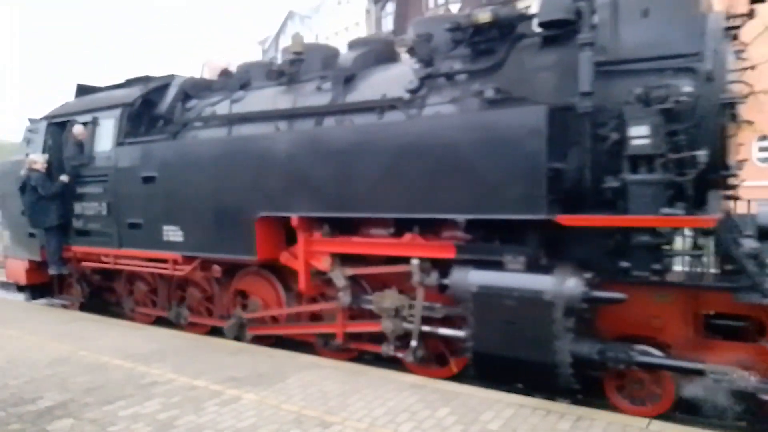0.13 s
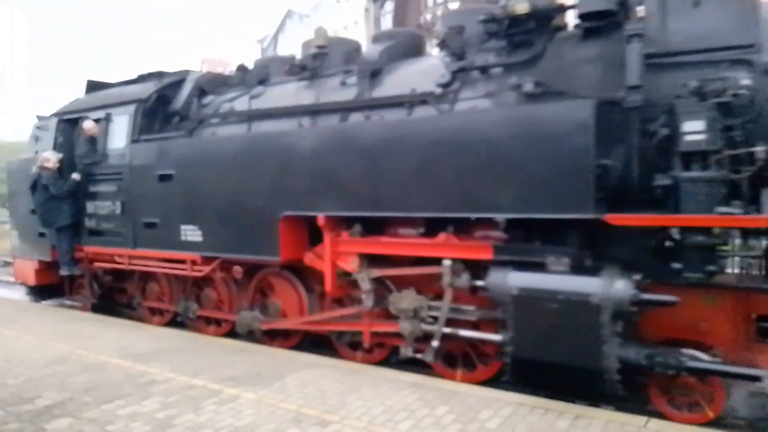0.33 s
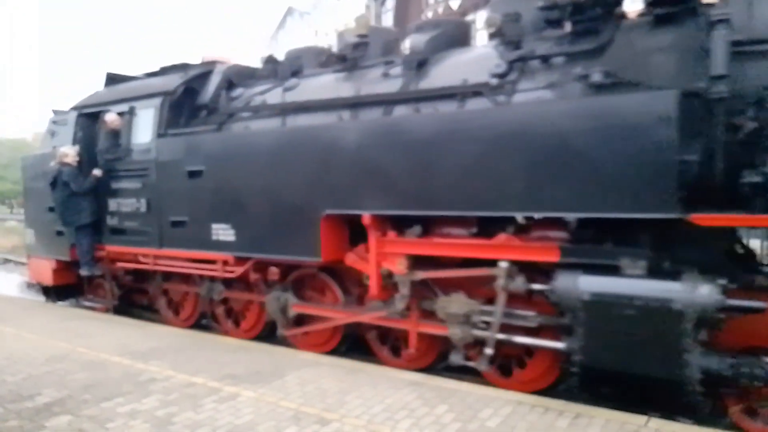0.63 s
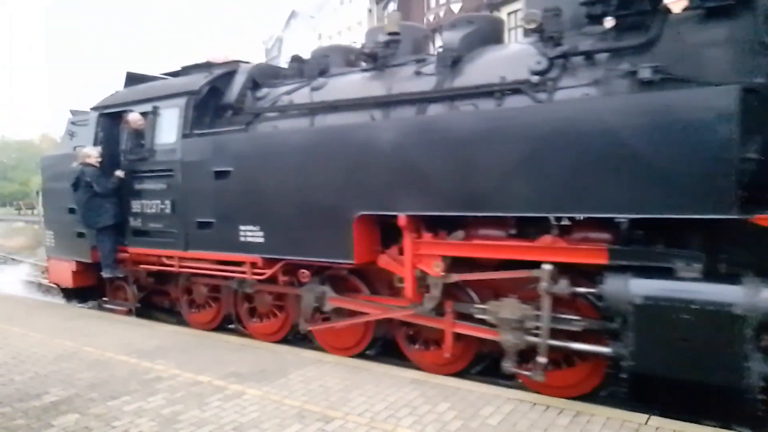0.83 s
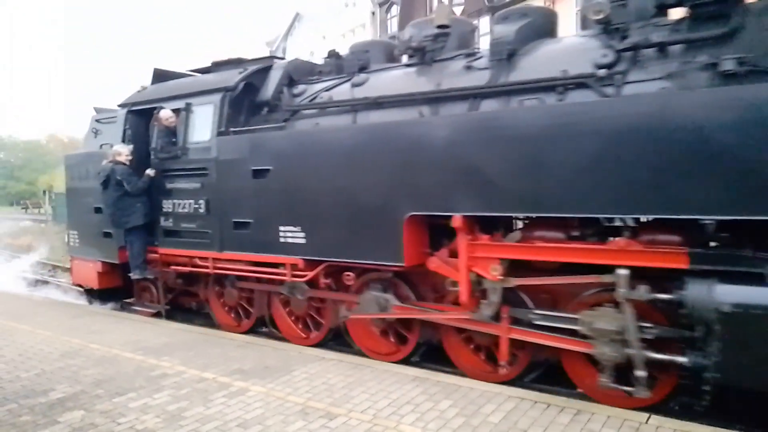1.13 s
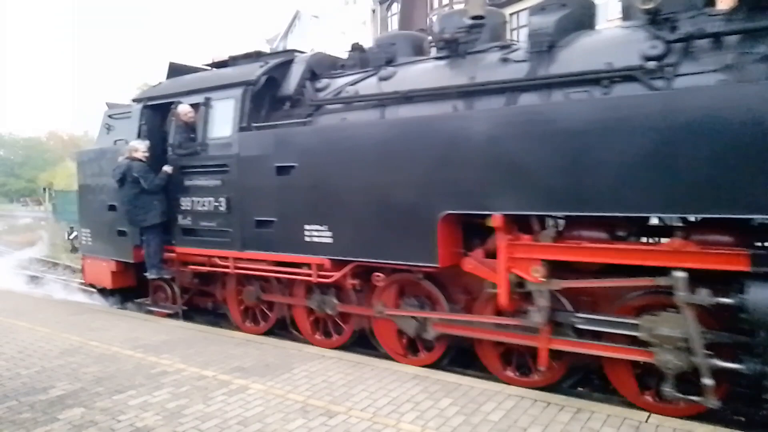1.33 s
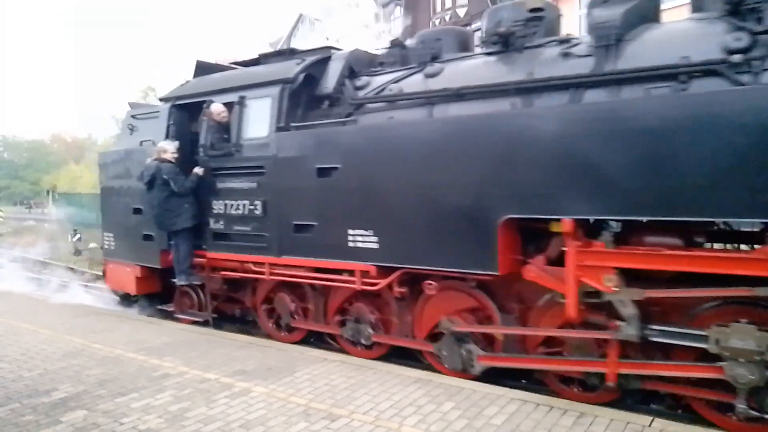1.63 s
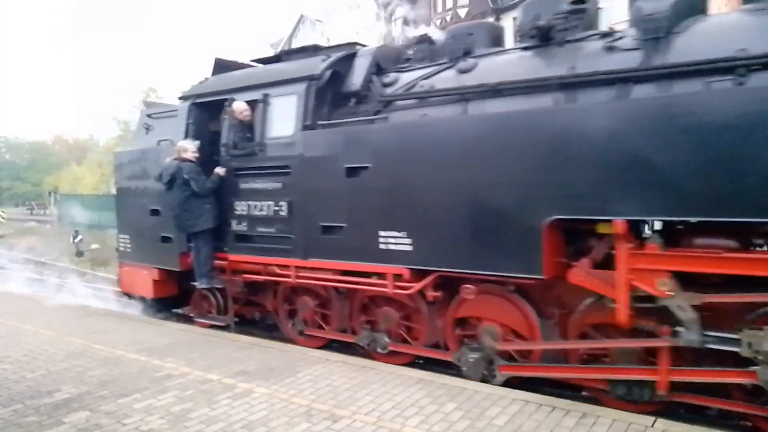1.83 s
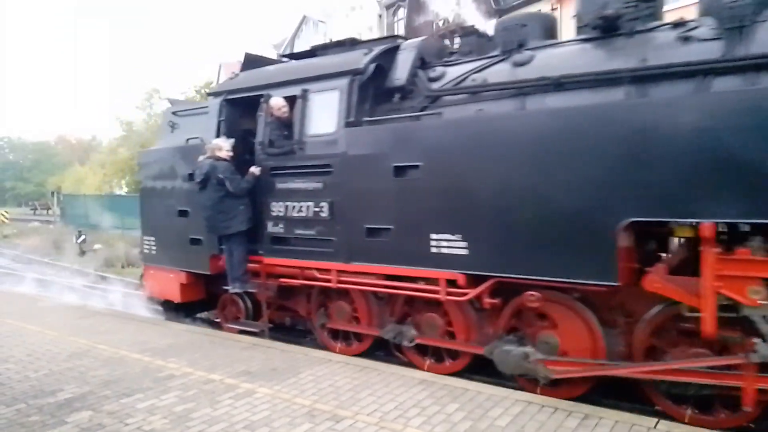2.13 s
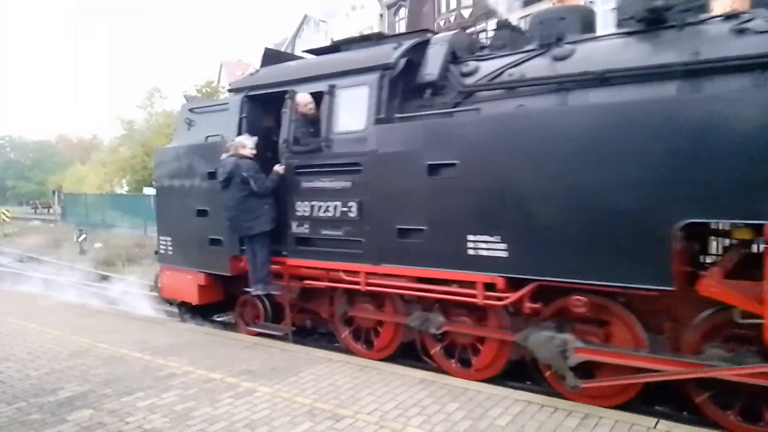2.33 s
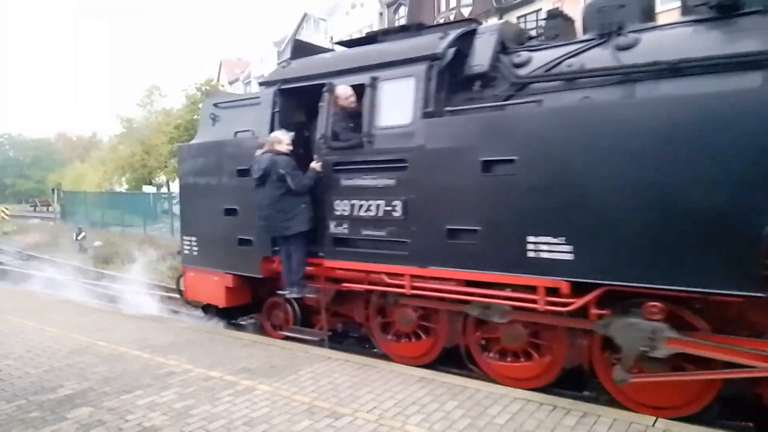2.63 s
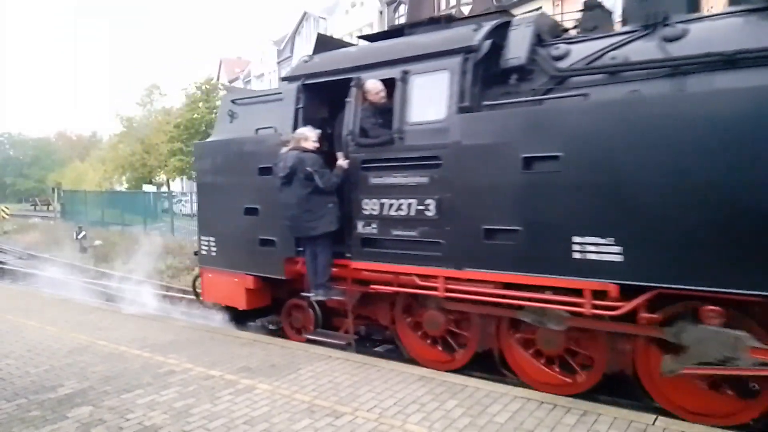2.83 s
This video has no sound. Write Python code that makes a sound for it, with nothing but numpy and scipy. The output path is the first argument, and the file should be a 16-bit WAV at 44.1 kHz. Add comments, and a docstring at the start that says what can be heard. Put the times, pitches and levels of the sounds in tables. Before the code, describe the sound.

Sharp, high steam hiss from a passing steam locomotive, with rumbling wheels, clanks and a spitting burst

```python
"""Steam tank locomotive coasting past

A steam tank locomotive coasts slowly past a platform, close by, in mono. Shaped noise makes a steam leak
that hisses sharply throughout; as the cylinder draws level a wet noise blast opens, spits and dies away.
Underneath, noise and sines make the engine rumble and throb; noise bands make the wheels roll and ring,
and decaying modes make the rods clank."""
import sys
import numpy as np
from scipy import signal
from scipy.fft import rfft, irfft, next_fast_len
from scipy.io import wavfile
from scipy.ndimage import uniform_filter1d, map_coordinates

SR = 44100
rng = np.random.default_rng(int(sys.argv[2]) if len(sys.argv) > 2 else 0)


def pcm_store(signal):
    """Save signal as 16-bit PCM."""
    levels = np.round(np.clip(np.atleast_2d(signal), -1, 1) * 32767)
    wavfile.write(sys.argv[1], SR, levels.astype(np.int16).T)


N = 131859

# Every colour table is a noise spectrum. Each row: frequency in Hz, relative level in dB per Hz.
# Diffuse hiss behind everything, as a colour.
FLOOR_COLOUR = [(1000, 0), (2300, 1.5), (3100, -10), (5200, -2), (12000, -1), (15000, -4.5)]
FLOOR_DB, TOP_HZ = -55, 15760  # TOP_HZ: upper band limit of the whole mix

# Engine rumble over time. Each row: time in seconds, level in dB.
RUMBLE_LEVEL = [(0, -46), (.85, -48), (1.25, -46.5), (1.75, -48), (2.07, -45.5), (2.58, -50), (2.99, -45)]
# The engine's low body, as a colour.
RUMBLE_COLOUR = [(110, -52), (165, -44), (200, -4.5), (280, 3.5), (385, 3.5), (450, -3.5), (560, -15.5),
                 (1000, -26.5)]
# The deep bass under the engine, as a colour.
BASS_COLOUR = [(22, -43), (38, -12), (62, 2.5), (115, 3.5), (140, -4.5), (165, -15), (260, -54)]
THROB_PER_S, THROB_DB = 15, 1.17
BASS_DB, HUM_HZ, HUM_DB = -15, 82.4, -24  # levels relative to the rumble
SURGES_S, SURGE_SPREAD_S, SURGE_DB = [.12, 1.22, 2.11, 2.96], 0.032, 5.5  # swells of the bass

# Low roar of rolling. Each row: time in seconds, level in dB.
ROAR_LEVEL = [(0, -48.5), (.3, -45), (.41, -49.5), (.6, -48), (.9, -46), (1.07, -48.5), (1.2, -45.5),
              (1.6, -53), (2.0, -49.5), (2.3, -49.5), (2.6, -54.5), (2.99, -54.5)]
# The rolling roar, as a colour.
ROAR_COLOUR = [(140, -27), (480, -7.5), (610, 1.5), (735, 3.5), (880, -4.5), (1040, -10), (1250, -17),
               (2000, -24.5), (3000, -50)]
# The wheels' ringing band. Each row: time in seconds, level in dB, centre in Hz, width in Hz.
WHEEL_RING = [(0, -45, 1660, 793), (.26, -48, 1650, 698), (.4, -49.5, 1640, 302.3), (.6, -52, 1560, 482),
              (.77, -57, 1556, 257.6), (.93, -52, 1549, 150.5), (1.07, -57.5, 1535, 140.3),
              (1.2, -42, 1607, 450), (1.7, -70, 1660, 330)]
# Modes of the singing wheel. Each row: frequency in Hz, half-width in Hz, relative level in dB.
WHEEL_MODES = [(1229, 33, 0.5), (1315, 28, -14.5), (1643, 54, -1), (1747, 19, -2.5), (2030, 210, -15)]
SING_DB, SING_NEAREST_S, SING_PASS_S, SING_GRAIN_DB = -46.5, 2.2, 0.5, 0.5

# Thuds of the running gear. Each row: start in seconds, level in dB, pitch in Hz.
THUDS = [(.542, -41, 250), (.683, -33.5, 277), (1.116, -34.5, 294), (1.373, -35.5, 338),
         (2.278, -35.5, 299), (2.354, -39, 280)]
THUD_T60_S = 0.091
# Clicks of small steel parts. Each row: start in seconds, level in dB, centre in Hz.
CLICKS = [(.433, -49.5, 3760), (.481, -53, 2920)]
CLICK_WIDTH_HZ, CLICK_T60_S = 280, 0.052
# Rod clanks. Each row: start in seconds, knock level in dB, rattle T60 in seconds, note in Hz.
CLANKS = [(.230, -41.5, 0.51, 645), (.430, -39, 0.86, 1163), (0.481, -45, 0.49, 690),
          (1.098, -40, 0.26, 1544), (2.613, -53, 0.082, 1880)]
# Modes of the rod. Each row: frequency in Hz, half-width in Hz, relative level in dB.
ROD_MODES = [(274, 31, -1), (735, 98, 1.5), (1174, 65, -1.5), (1470, 190, -8), (2090, 220, -18)]
STRIKE_DB, NOTE_DB, NOTE_T60_S = -2.5, 1.5, 0.11  # levels relative to the knock

# Steam leak over time. Each row: time in seconds, level in dB.
LEAK_LEVEL = [(0, -32.5), (.62, -32.5), (.86, -35), (1.19, -32), (1.22, -27.5), (1.36, -32), (1.47, -29.5),
              (1.6, -31.5), (1.9, -30.3), (2.1, -29), (2.3, -30.5), (2.63, -31.5), (2.85, -30.5),
              (2.99, -32)]
# The narrow jet of the leak, as a colour.
LEAK_COLOUR = [(2000, -44), (4500, -56), (6400, -38.5), (7000, -25), (7600, -15), (8600, -6.5), (9200, -2),
               (9580, -0.5), (10100, -4), (10800, -8.5), (11650, -13.5), (12250, -45), (15800, -35)]
# Top fizz of the leak over time. Each row: time in seconds, level in dB.
FIZZ_LEVEL = [(0, -68), (1.18, -76), (1.23, -40), (1.5, -38.5), (1.78, -36.5), (1.95, -40), (2.05, -47),
              (2.45, -42.5), (2.99, -48)]
# The top fizz, as a colour.
FIZZ_COLOUR = [(9000, -55), (12000, 4), (14000, -2.5), (14700, -10), (15400, -1), (16000, 4)]
# Thin edge tones of the jet. Each row: frequency in Hz, full level in dB, time of full level in seconds.
EDGE_TONES = [(13100, -49, 2.72), (14600, -49, 3)]
EDGE_TONE_WIDTH_HZ, EDGE_TONE_RISE_DB_PER_S = 125, 38
JET_NOTE_HZ, JET_NOTE_WIDTH_HZ, JET_NOTE_DB = 9590, 61, -33.5
JET_NOTE_S, JET_NOTE_SPREAD_S = 2.12, 0.12
SPUTTER_PER_S, SPUTTER_DB, SPUTTER_DECAY_S = 110, 0.69, 0.0087  # droplets flare in the jet

# Water spitting in the steam. Each row: start in seconds, pop level in dB, hiss level in dB.
SPITS = [(1.21, -33.5, -23), (1.2927, -29, -32), (1.3985, -31, -22), (1.4623, -27, -25)]
SPIT_RISE_S, SPIT_HZ = 0.002, 1234

# Cylinder blasts. Each row: start in seconds, body level in dB, treble level in dB,
# hold in seconds, time the port stays open in seconds.
BLASTS = [(-.1, -47, -41.5, 0.07, 0.091), (1.199, -40.5, -40.5, 0.2, 0.77)]
# The body of the blast, as a colour.
BLAST_BODY_COLOUR = [(130, -56), (280, -4), (560, -6), (950, -3.5), (1250, 2.5), (1420, -2), (1850, 0),
                     (2550, -5), (2900, -16.5), (3600, -33)]
# The treble of the blast, as a colour.
BLAST_TREBLE_COLOUR = [(2300, -11), (3200, -22), (3750, -2), (4020, -11), (4350, -2), (4650, -7), (5600, 1),
                       (5950, -4), (7100, 5.5), (8500, -1.5), (12000, -32)]
BLAST_ATTACK_S, BLAST_SEEP_S = 0.0064, 0.047  # the body seeps in before the treble breaks out
BLAST_FALL_DB_PER_S, BLAST_TREBLE_FALL_DB_PER_S, BLAST_SHUT_DB_PER_S = 8.5, 25.5, 63
BLAST_CRACKLE_DB, BLAST_FLUTTER_DB = 0.64, 0.64  # droplets roughen the body; the treble flutters


def amp(db):
    """Decibels to gain."""
    return 10 ** (np.asarray(db) / 20)


def unit(x):
    """Scale to rms 1."""
    return x / np.sqrt(np.mean(x ** 2) + 1e-20)


def clock():
    """Time of each sample in seconds."""
    return np.arange(N) / SR


def curves(rows):
    """One value per sample for each column after the time."""
    times, *columns = np.transpose(rows)
    return [np.interp(clock(), times, column) for column in columns]


def bell(centre_s, spread_s):
    """A smooth swell that peaks at 1."""
    return np.exp(-.5 * ((clock() - centre_s) / spread_s) ** 2)


def wobble(rate):
    """A smooth random curve, rate knots a second."""
    return map_coordinates(rng.standard_normal(4096), [clock() * rate], mode="wrap")


def sputter():
    """Sudden flares at random moments, each dying away; mean 0, rms 1."""
    drops = (rng.random(N) < SPUTTER_PER_S / SR) * rng.uniform(0.32, 1, N)
    flares = signal.lfilter([1], [1, -np.exp(-1 / (SPUTTER_DECAY_S * SR))], drops)
    return unit(flares - flares.mean())


def burst(start, attack, hold, fall_db_per_s):
    """Envelope: linear rise, then a steady fall in dB once hold seconds have passed since the start."""
    age = clock() - start
    fall = amp(-fall_db_per_s * np.maximum(age - hold, 0))
    return np.clip(age / attack, 0, 1) * fall


def filtered(x, response):
    """Multiply the spectrum of x by a response of frequency."""
    m = next_fast_len(N + SR // 2)
    gains = response(np.fft.rfftfreq(m, 1 / SR))
    return irfft(rfft(x, m) * gains, m)[:N]


def rush(colour, patchy_db):
    """Noise of rms 1 with a colour and patches of gain that drift in time and frequency."""
    spectrum = signal.stft(rng.standard_normal(N), nperseg=512)[2]
    patches = uniform_filter1d(rng.standard_normal(spectrum.shape), size=4, axis=0)  # across frequency
    patches = uniform_filter1d(patches, size=22, axis=1)  # along time
    noise = signal.istft(spectrum * amp(patchy_db * unit(patches)), nperseg=512)[1][:N]
    f, db = np.transpose(colour)
    return unit(filtered(noise, lambda hz: amp(np.interp(np.log(hz + 1), np.log(f), db))))


def resonant(modes):
    """Noise of rms 1 in resonances given by frequency, half-width and level."""
    def response(f):
        return sum(amp(db) / (1 + ((f - hz) / width) ** 2) for hz, width, db in modes)
    return unit(filtered(rng.standard_normal(N), response))


def moving_band(hz, width):
    """Noise of rms 1 in a band whose centre and width vary in time."""
    knots = np.cumsum(width) / SR  # a wider band reads its random curves faster
    re = map_coordinates(rng.standard_normal(16384), [knots], mode="wrap")
    im = map_coordinates(rng.standard_normal(16384), [knots], mode="wrap")
    carrier = np.exp(2j * np.pi * np.cumsum(hz) / SR)
    return unit(np.real((re + 1j * im) * carrier))


def diffuse_hiss():
    """A patchy, steady-level noise floor behind the locomotive."""
    return amp(FLOOR_DB) * rush(FLOOR_COLOUR, patchy_db=5.0)


def rumble():
    """The engine's throbbing body, a faint hum and a deep bass that surges about once a second."""
    level_db, = curves(RUMBLE_LEVEL)
    throb = np.sin(2 * np.pi * THROB_PER_S * clock() + wobble(rate=2.0))
    body = rush(RUMBLE_COLOUR, patchy_db=1.1) * amp(THROB_DB * throb)
    hum = amp(HUM_DB) * unit(np.sin(2 * np.pi * HUM_HZ * clock() + .5 * wobble(rate=3.4)))
    surge = sum(bell(s, SURGE_SPREAD_S) for s in SURGES_S)
    bass = amp(BASS_DB + SURGE_DB * surge) * rush(BASS_COLOUR, patchy_db=0.5)
    return amp(level_db) * (body + hum + bass)


def wheels():
    """Rough rolling roars and keeps the steel wheels ringing; one sings on its own modes as it passes."""
    roar_db, = curves(ROAR_LEVEL)
    ring_db, hz, width = curves(WHEEL_RING)
    roar = rush(ROAR_COLOUR, patchy_db=1.55) * amp(roar_db + 0.45 * wobble(rate=35))
    ring = moving_band(hz, width) * amp(ring_db)
    nearness = bell(SING_NEAREST_S, SING_PASS_S)
    sing = resonant(WHEEL_MODES) * nearness * amp(SING_DB + SING_GRAIN_DB * sputter())
    return roar + ring + sing


def thuds():
    """The running gear bumps against the frame with a dull, short boom: a decaying sine."""
    out = np.zeros(N)
    for s, db, hz in THUDS:
        boom = np.sin(2 * np.pi * hz * (clock() - s))
        out += amp(db) * boom * burst(s, 0.0065, 0, 60 / THUD_T60_S)
    return out


def clicks():
    """Small steel parts snap together along with two of the clanks: short bursts of narrow noise."""
    out = np.zeros(N)
    for s, db, hz in CLICKS:
        snap = resonant([(hz, CLICK_WIDTH_HZ, 0)])
        out += amp(db) * snap * burst(s, 0.0026, 0.005, 60 / CLICK_T60_S)
    return out


def rod_strike(start):
    """A hard blow sets every rod mode ringing at once; wider modes die sooner."""
    age = np.maximum(clock() - start, 0)
    ringing = sum(amp(db) * np.cos(2 * np.pi * hz * age) * np.exp(-np.pi * width * age)
                  for hz, width, db in ROD_MODES)
    return (clock() >= start) * ringing


def clanks():
    """Slack in the rods is taken up: a hard strike on their modes, a short note and a dying rattle."""
    rattle, out = resonant(ROD_MODES), np.zeros(N)
    for s, knock_db, t60, note_hz in CLANKS:
        age = np.maximum(clock() - s, 0)
        strike = amp(STRIKE_DB) * rod_strike(s)
        note = np.sin(2 * np.pi * note_hz * age) * burst(s, 0.0037, 0.0061, 60 / NOTE_T60_S)
        dying_rattle = rattle * burst(s, 0.0035, 0, 60 / t60)
        out += amp(knock_db) * (strike + amp(NOTE_DB) * note + dying_rattle)
    return out


def leak():
    """A narrow sputtering jet, with fizz above it and edge tones that come in as the cab nears."""
    level_db, = curves(LEAK_LEVEL)
    fizz_db, = curves(FIZZ_LEVEL)
    flare_db = SPUTTER_DB * sputter()
    out = rush(LEAK_COLOUR, patchy_db=1.26) * amp(level_db + flare_db)
    out += rush(FIZZ_COLOUR, patchy_db=2.5) * amp(fizz_db + flare_db)
    for hz, full_db, full_s in EDGE_TONES:
        tone_db = full_db - EDGE_TONE_RISE_DB_PER_S * np.maximum(full_s - clock(), 0)
        out += resonant([(hz, EDGE_TONE_WIDTH_HZ, 0)]) * amp(tone_db)
    return out


def jet_note():
    """The jet briefly focuses into a narrow, breathy whistle and relaxes again."""
    whistle = resonant([(JET_NOTE_HZ, JET_NOTE_WIDTH_HZ, 0)])
    return amp(JET_NOTE_DB) * bell(JET_NOTE_S, JET_NOTE_SPREAD_S) * whistle


def spits():
    """Slugs of water leave the pipe with a hollow pop and a flash of hiss."""
    hiss, out = resonant([(9680, 510, 0)]), np.zeros(N)
    for s, pop_db, hiss_db in SPITS:
        age = np.maximum(clock() - s, 0)
        pop = np.sin(2 * np.pi * SPIT_HZ * age)
        u = age / SPIT_RISE_S
        flash = u * np.exp(1 - u)  # peaks at 1 after the rise time
        out += flash * (amp(pop_db) * pop + amp(hiss_db) * hiss)
    return out


def blasts():
    """Cylinder steam bursts out and fades until the port shuts; the treble dies sooner than the body."""
    body = rush(BLAST_BODY_COLOUR, patchy_db=2.5) * amp(BLAST_CRACKLE_DB * sputter())
    treble = rush(BLAST_TREBLE_COLOUR, patchy_db=3.0) * amp(BLAST_FLUTTER_DB * wobble(rate=78))
    out = np.zeros(N)
    for s, body_db, treble_db, hold, open_s in BLASTS:  # a start below 0 leaves only the tail
        port = amp(-BLAST_SHUT_DB_PER_S * np.maximum(clock() - s - open_s, 0))
        body_swell = burst(s - BLAST_SEEP_S, BLAST_SEEP_S, hold, BLAST_FALL_DB_PER_S)
        treble_swell = burst(s, BLAST_ATTACK_S, hold, BLAST_TREBLE_FALL_DB_PER_S)
        out += port * amp(body_db) * body * body_swell
        out += port * amp(treble_db) * treble * treble_swell
    return out


def scene():
    """All sources over a diffuse hiss, alike in both channels."""
    background = diffuse_hiss() + rumble() + wheels()
    metal = thuds() + clicks() + clanks()
    steam = leak() + jet_note() + spits() + blasts()
    return np.tile(background + metal + steam, (2, 1))


def record(dry):
    """Cut everything above the band limit with a sharp edge."""
    return np.array([filtered(channel, lambda hz: hz < TOP_HZ) for channel in dry])


dry = scene()
out = record(dry)
pcm_store(out)
```